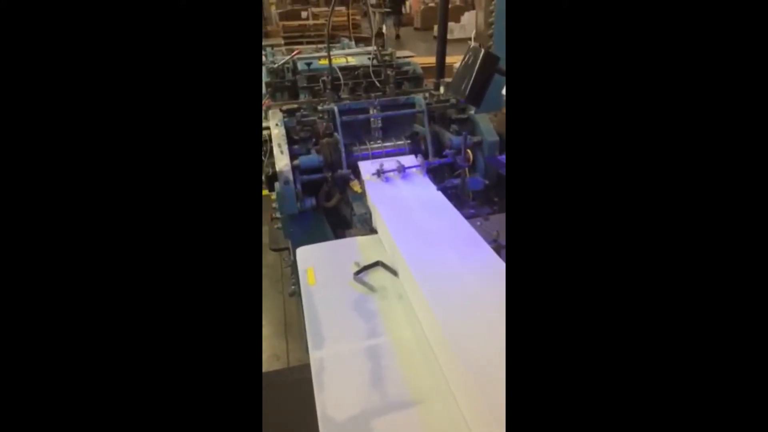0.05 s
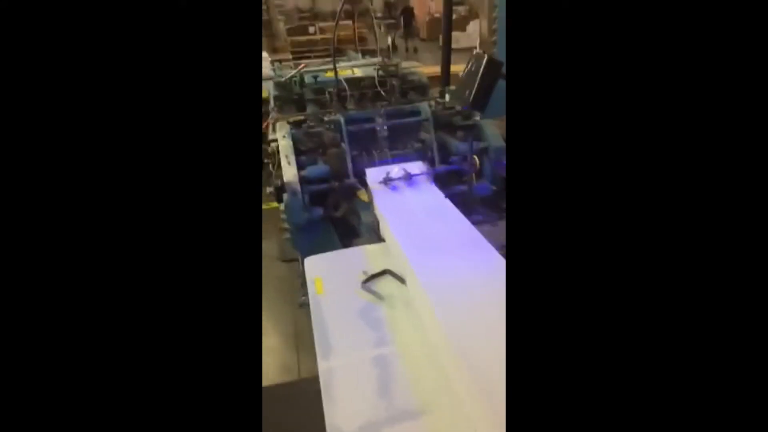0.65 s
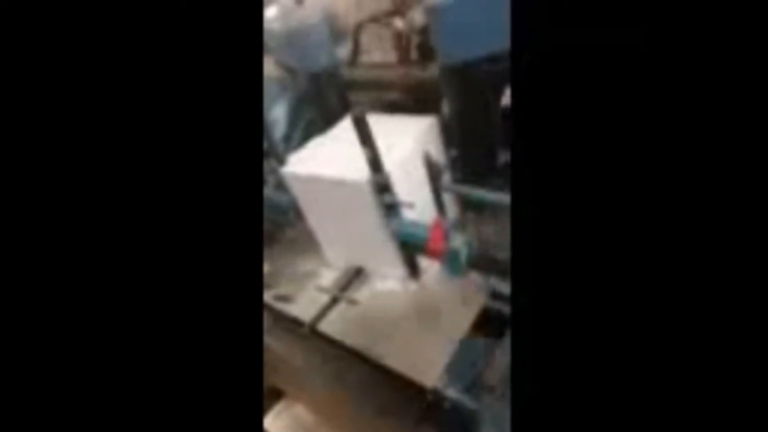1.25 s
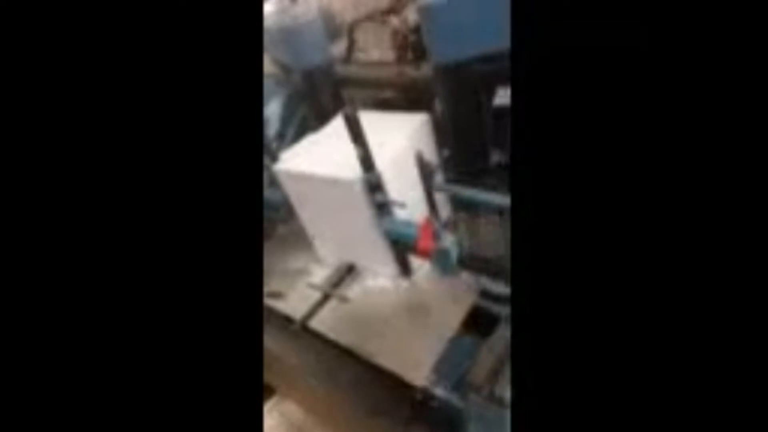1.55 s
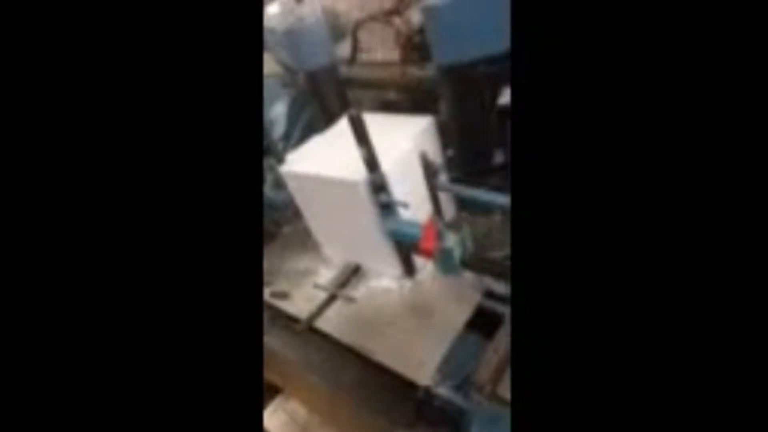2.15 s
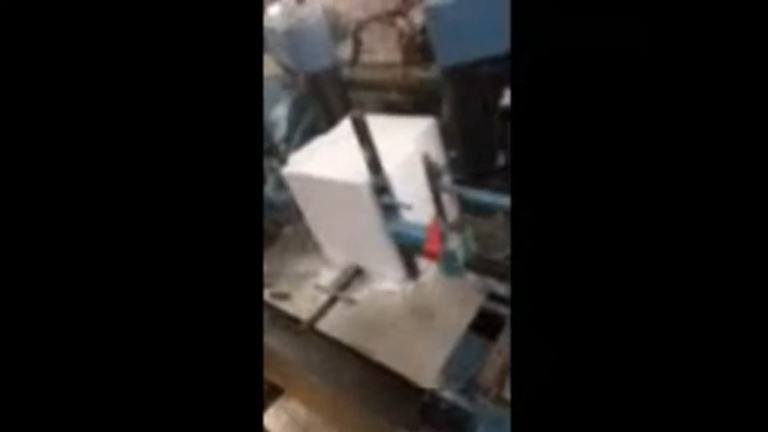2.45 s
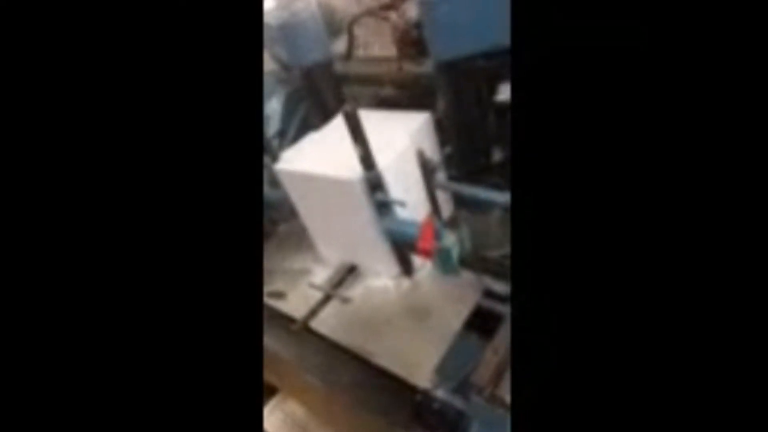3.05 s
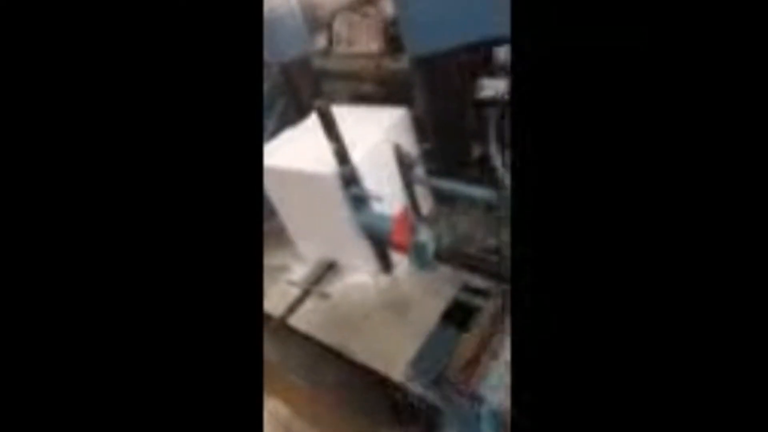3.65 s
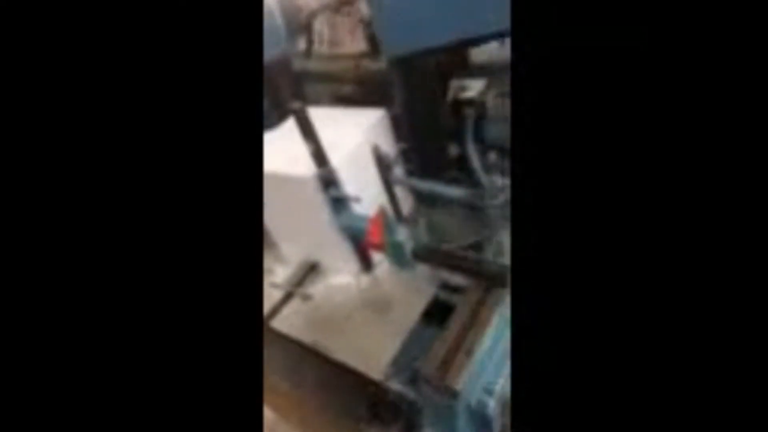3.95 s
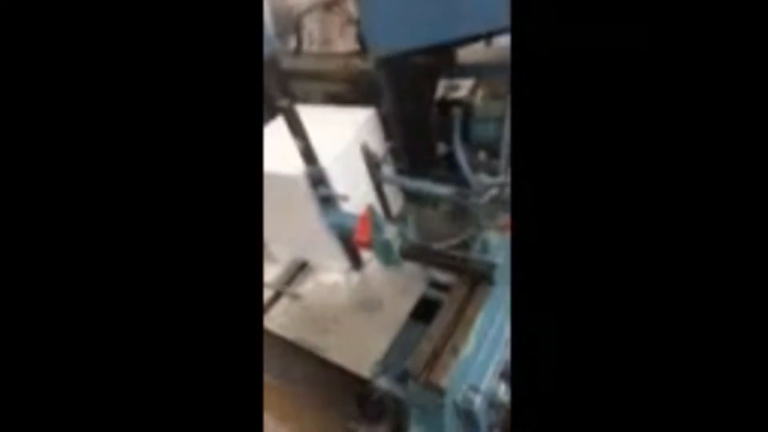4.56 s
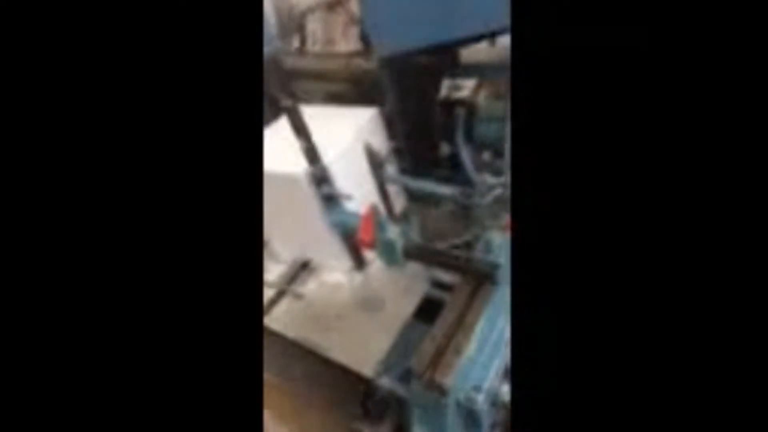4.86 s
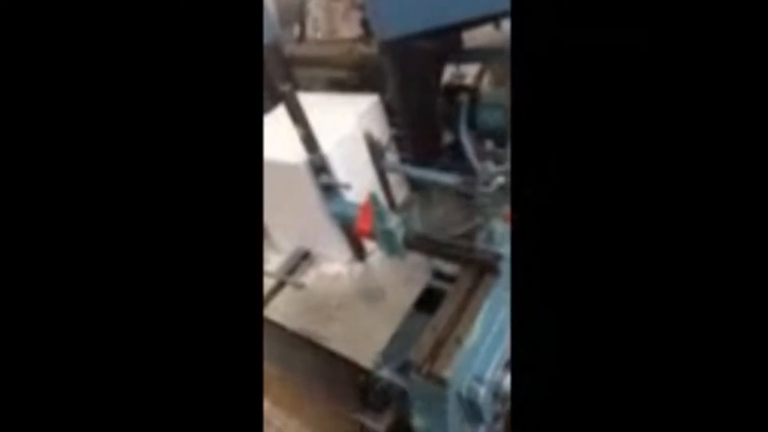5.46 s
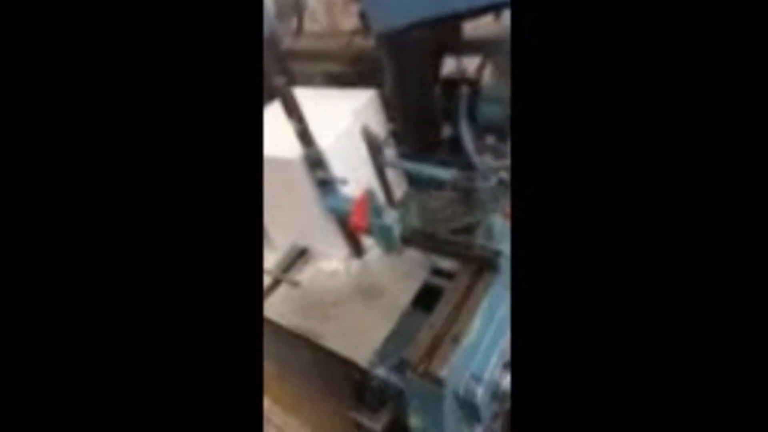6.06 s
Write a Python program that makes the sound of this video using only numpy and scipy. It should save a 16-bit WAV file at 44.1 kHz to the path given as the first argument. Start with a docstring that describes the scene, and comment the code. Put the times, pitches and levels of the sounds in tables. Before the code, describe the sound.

A paper converting machine runs close by in a factory hall, clacking evenly about seven times a second. At first it is heard at the paper feed: bright, ringing metal impacts, dull knocks from cams and levers, and hissing swishes of paper over a deep rumble and gear hum, with two quick snaps of paper pulling taut in the first 0.3 seconds. At about 0.9 seconds everything cuts to silence. At 1.2 seconds the machine returns at the stacker, at the same pace but muffled, with little treble or deep bass. A heavy, throbbing stroke leads each sharp clack, with busy knocks and paper friction between. A loose part thumps at roughly 2.2, 3, 3.8, 4.7 and 4.9 seconds. From about 4.5 seconds a faint, fluttering rubbing whine rises, strongest near 5.8 seconds, while the clacking continues to the end.

```python
"""A paper converting machine cycles about seven times a second in a factory hall.
In each cycle a metal impact rebounds and excites ringing modes, cams and levers give dull, damped
knocks, and sliding paper makes friction noise, all over drive rumble and gear hum. It is heard first
at the web feed, where the web snaps taut, then, after a silent gap, at the stacker through a narrow
band: there a heavy stroke leads each clack, a loose part thumps and a rubbing whine comes up late."""
import sys
import numpy as np
from scipy import signal
from scipy.io import wavfile
from scipy.ndimage import uniform_filter1d

SR = 44100
rng = np.random.default_rng(int(sys.argv[2]) if len(sys.argv) > 2 else 0)


def generate_wav(signal):
    """Clip the signal to [-1, 1] and save it as 16-bit WAV at the path in sys.argv[1]."""
    frames = np.transpose(np.atleast_2d(signal))
    scaled = np.clip(frames, -1, 1) * 32767
    pcm = np.round(scaled).astype(np.int16)
    wavfile.write(sys.argv[1], SR, pcm)


N = 278271
TIME = np.arange(N) / SR
CYCLE_S = .138706
FEED_START_S, STACKER_START_S = .019, 1.2732  # first clack at each place
GAP_START_S, GAP_END_S = .8555, 1.2335


def amp(db):
    """Amplitude ratio of a level in decibels."""
    return 10 ** (np.asarray(db) / 20)


def unit_rms(x):
    """Normalisation to rms 1."""
    return x / np.sqrt(np.mean(x ** 2) + 1e-20)


def chance(size=None):
    """Uniform scatter between -1 and 1."""
    return rng.uniform(-1, 1, size)


def drift(rate_hz):
    """Random modulation of rms 1: straight lines between rate_hz random values a second."""
    knots = np.arange(0, N / SR + 1, 1 / rate_hz)
    return unit_rms(np.interp(TIME, knots, rng.uniform(-1.034, 1, 8192)[:len(knots)]))


def add(mix, s, sound):
    """Superposition: a sound joins the mix at time s; what falls outside is dropped."""
    start = round(s * SR)
    sound = sound[max(-start, 0):]
    part = mix[max(start, 0):][:len(sound)]
    part += sound[:len(part)]


def cycle_times(first_s):
    """Periodicity: the times at which one phase of the machine cycle recurs."""
    return np.arange(first_s, N / SR, CYCLE_S)


def blow_levels(times, vary_db, accents):
    """Force scatter: random levels in dB, except that each accent sets the blow nearest to it."""
    db = np.asarray(vary_db) * chance(size=(len(times), len(vary_db)))
    for s, *accent_db in accents:
        db[np.argmin(abs(times - s))] = accent_db
    return db


def patchy_noise(spectrum, patchy_db):
    """Spectral shaping of white noise; short patches of time and frequency swell and fade in it."""
    hz, _, bins = signal.stft(rng.standard_normal(N), SR, nperseg=2048)
    points_hz, db = np.transpose(spectrum)
    gain = amp(np.interp(np.log(hz + 1), np.log(points_hz), db))
    steady = signal.istft(bins * gain[:, None], SR)[1][:N] * np.sqrt(SR / 2)
    bins = signal.stft(steady, nperseg=512, noverlap=384)[2]
    patches = uniform_filter1d(rng.standard_normal(bins.shape), size=3, axis=0)
    patches = unit_rms(uniform_filter1d(patches, size=6, axis=1))
    return signal.istft(bins * amp(patchy_db * np.clip(patches, -2, 2)), nperseg=512, noverlap=384)[1][:N]


def hum(tones, waver_db, wobble_rad):
    """Rotating gears and motors radiate tones, modulated in level and phase as the load wavers."""
    out = np.zeros(N)
    for hz, db in tones:
        envelope = np.sqrt(2) * amp(db + waver_db * drift(12))
        out += envelope * np.sin(2 * np.pi * hz * TIME + wobble_rad * drift(8))
    return out


def ring(hz, t60, t):
    """Free vibration of a damped mode, falling 60 dB in t60 seconds."""
    return np.sin(2 * np.pi * hz * t) * amp(-60 * t / t60)


def tick(hz=2200, decay_s=0.00023):
    """First contact is brief, so its spectrum is wide: a dry noise burst of peak 1."""
    t = np.arange(SR // 200) / SR
    pulse = rng.standard_normal(len(t)) * np.exp(-t / decay_s)
    burst = signal.lfilter(*signal.butter(1, [hz / 2, hz * 2], "band", fs=SR), pulse)
    return burst / abs(burst).max()


def clacks(first_s, accents, modes, crack_db, body_db, tick_db, vary_db, bounce_db, bounce_vary_db,
           bounce_s, chatter, chatter_s, detune, spread_s=0.00052):
    """Impact excitation: once a cycle metal strikes, rebounds twice and chatters on the same modes."""
    out, t = np.zeros(N), np.arange(SR // 12) / SR
    attack = round(.015 * SR)
    hz, db, t60 = np.transpose(modes)[:, :, None]
    is_body = hz[:, 0] < 1600
    times = cycle_times(first_s)
    for s, (crack, body) in zip(times, blow_levels(times, [vary_db, vary_db], accents)):
        force = chatter * rng.standard_normal(len(t)) * np.exp(-t / chatter_s)
        force[0] += 1
        gaps_s = bounce_s * np.array([1, .85]) * (1 + 0.12 * chance(size=2))
        rebounds = amp(bounce_db + bounce_vary_db * chance()) * np.array([1, .6])
        force[(np.cumsum(gaps_s) * SR).astype(int)] += rebounds
        # the contact point shifts, scattering each mode's level, pitch and onset
        strength, pitch, path = chance(size=(3, len(modes), 1))
        since_onset = np.maximum(t - spread_s * abs(path), 0)
        rings = amp(db + 2 * strength) * ring(hz * (1 + detune * pitch), t60, since_onset)
        # each blow divides differently between the heavy body and the light edge, which cracks
        for group, level_db in ((is_body, body + body_db), (~is_body, crack + crack_db)):
            response = signal.fftconvolve(force, rings[group].sum(0))[:len(t)]
            attack_rms = np.sqrt(np.mean(response[:attack] ** 2))
            add(out, s, amp(level_db) * response / attack_rms)
        add(out, s, amp(tick_db + crack) * tick())
    return out


def knock(hz, t60, rise_s=0.00089):
    """Cushioned impact: one mode builds up softly and radiates little below its own frequency."""
    t = np.arange(SR // 10) / SR
    vibration = ring(hz, t60, t) * (1 - np.exp(-t / rise_s))
    return signal.lfilter(*signal.butter(1, hz / 4, "high", fs=SR), vibration)


def levers(first_s, knocks, vary_db, loose_s):
    """Periodic impacts: cams and levers knock in every cycle, with scatter in force, time and pitch."""
    out = np.zeros(N)
    for start in cycle_times(first_s - CYCLE_S):
        scatter = rng.uniform(-1.11, 1, (len(knocks), 3))
        for (delay, hz, db, t60), (force, play, pitch) in zip(knocks, scatter):
            blow = amp(db + vary_db * force) * knock(hz * (1 + .05 * pitch), t60)
            add(out, start + delay + loose_s * play, blow)
    return out


def paper(first_s, spectrum, swishes, grain_db, vary_db, patchy_db):
    """Sliding friction: paper tugged in every cycle gives noise swishes whose powers add."""
    power = 0
    for delay, db, rise_s, fade_db_per_s in swishes:
        since = (TIME - first_s - delay) % CYCLE_S
        fade = amp(-fade_db_per_s * since)
        rise = np.exp((since - CYCLE_S) / rise_s)
        power += (amp(db) * np.maximum(fade, rise)) ** 2
    friction = patchy_noise(spectrum, patchy_db)
    rustle = amp(grain_db * drift(600) + vary_db * drift(14))
    return friction * np.sqrt(power) * rustle


def web_snaps(low_hz, decay_s):
    """Sudden tension: the web is jerked taut and radiates a short, bright hiss."""
    # snaps of the web: (time [s], level [dB])
    snaps = [(0.126, -18), (.2655, -15.5)]
    out, t = np.zeros(N), np.arange(SR // 20) / SR
    for s, db in snaps:
        hiss = signal.lfilter(*signal.butter(2, low_hz, "high", fs=SR), rng.standard_normal(len(t)))
        add(out, s, amp(db) * hiss * np.exp(-t / decay_s))
    return out


def hall(direct, wet_db, t60):
    """Reverberation: dense, weak reflections from the frame and the hall follow the direct sound."""
    t = np.arange(SR // 2) / SR
    reflections = rng.standard_normal(len(t)) * (rng.random(len(t)) < .05)
    response = reflections * (t > .004) * amp(-60 * t / t60)
    return direct + amp(wet_db) * signal.fftconvolve(direct, response / np.linalg.norm(response))[:N]


def feed():
    """Superposition at the web feed: ringing clacks, knocks, deep rumble, hum and hissing paper."""
    # drive rumble: (frequency [Hz], spectral level [dB])
    rumble_spectrum = [(20, -72.5), (38, -60.5), (56, -53), (80, -47), (180, -48), (280, -52), (450, -54),
                       (700, -57), (1030, -54.5), (1500, -57.5), (3000, -62.5), (8000, -66.5),
                       (16000, -74.5)]
    # gear and motor tones: (frequency [Hz], rms level [dB])
    hum_tones = [(58, -35.5), (194, -35), (345, -29), (721, -38.5), (974, -39.5), (1044, -36.5)]
    # modes of the struck metal: (frequency [Hz], relative level [dB], t60 [s])
    modes = [(760, -6, 0.015), (882, 4, 0.023), (1153, -10, .03), (1300, 15.5, 0.031), (1540, 2, 0.036),
             (1770, -3.5, .02), (1810, 3, 0.021), (2193, 3, 0.012), (2720, -5.5, 0.011),
             (3630, -1.5, 0.012)]
    # clacks that stand out: (time [s], crack gain [dB], body gain [dB])
    accents = [(.435, 1, 3), (.712, -3, .5)]
    # cam and lever knocks: (delay after clack [s], frequency [Hz], level [dB], t60 [s])
    knocks = [(0.022, 194, -20.5, 0.024), (0.046, 191.6, -24.5, 0.094), (.066, 634, -11, 0.011),
              (0.069, 1167, -19.5, 0.043), (0.089, 198, -21, 0.036), (0.096, 341, -23.5, 0.067),
              (.111, 186, -14, 0.032), (.126, 304, -17, 0.015)]
    # paper friction: (frequency [Hz], spectral level [dB])
    paper_spectrum = [(300, -82.5), (1500, -61.5), (3300, -59.5), (7000, -66.5), (16000, -80)]
    # tugs of the paper: (delay after clack [s], gain [dB], rise [s], fade [dB/s])
    swishes = [(.079, -3, 0.0036, 268), (0.107, 1.5, .001, 300.5)]
    hits = clacks(FEED_START_S, accents, modes, crack_db=-17.0, body_db=-19.0, tick_db=-10.5,
                  vary_db=1.9, bounce_db=-7, bounce_vary_db=2.5, bounce_s=0.00225,
                  chatter=0.061, chatter_s=0.012, detune=0.013)
    hits += levers(FEED_START_S, knocks, vary_db=9.0, loose_s=0.00074)
    running = patchy_noise(rumble_spectrum, patchy_db=1.5) * amp(1.1 * drift(120))
    running += hum(hum_tones, waver_db=0.5, wobble_rad=0.21)
    sliding = paper(FEED_START_S, paper_spectrum, swishes, grain_db=2.4, vary_db=-1.8, patchy_db=2.5)
    return hall(hits, wet_db=-16.0, t60=0.23) + running + sliding + web_snaps(low_hz=4000, decay_s=0.0042)


def slack(lag_s):
    """Periodic unloading of the stacker drive: 1 when slack, lag_s after each clack; 0 at full load."""
    return np.cos(np.pi * (TIME - STACKER_START_S - lag_s) / CYCLE_S) ** 6


def drive_rumble(level_db, load_db, lag_s, bass_db, bass_load_db, bass_lag_s, rough_db, bass_hz=130):
    """Load modulation: the stacker's rumble dips as the drive goes slack, its bass a little later."""
    # drive rumble: (frequency [Hz], spectral level [dB])
    spectrum = [(20, -78), (55, -102), (80, -66), (115, -51), (180, -50.5), (260, -53), (500, -54),
                (750, -56.5), (1100, -58), (1600, -62.5), (2200, -70), (3150, -69.5), (3700, -79)]
    rumble = patchy_noise(spectrum, patchy_db=2.5)
    bass = signal.sosfiltfilt(signal.butter(3, bass_hz, fs=SR, output="sos"), rumble)
    body = (rumble - bass) * amp(level_db - load_db * slack(lag_s) + rough_db * drift(200))
    return body + bass * amp(bass_db - bass_load_db * slack(bass_lag_s))


def throbs(level_db, vary_db, rise_s, detune, lead_s=0.02423):
    """Structural resonance: a heavy cushioned stroke rings the stacker's frame before each clack."""
    # modes of the frame: (frequency [Hz], relative level [dB], t60 [s])
    modes = [(189.7, 0, 0.058), (142, -12.5, 0.071)]
    # strokes that stand out: (time [s], gain [dB])
    accents = [(2.082, 4.5), (3.608, 6.5), (5.273, -10), (5.411, 4)]
    out, times = np.zeros(N), cycle_times(STACKER_START_S - lead_s)
    for s, (force_db,) in zip(times, blow_levels(times, [vary_db], accents)):
        for hz, db, t60 in modes:
            add(out, s, amp(level_db + force_db + db) * knock(hz * (1 + detune * chance()), t60, rise_s))
    return out


def thumps(hz, t60):
    """Damped impacts: a loose part thumps between clacks, four times six cycles apart, then once more."""
    # blows of the loose part: (time [s], level [dB])
    blows = [(2.187, -5.5), (3.025, -4.5), (3.848, -9), (4.69, -7.5), (4.918, -8)]
    out = np.zeros(N)
    for s, db in blows:
        add(out, s, amp(db) * knock(hz, t60))
    return out


def whine(flutter_db, jitter_rad):
    """Friction-excited vibration: a rubbing part sings, fluttering quickly in level and phase."""
    # partials of the rubbing part: (frequency [Hz], relative level [dB])
    partials = [(1314.5, 10), (2191, -3), (2466, -12)]
    # swell of the whine: (time [s], level [dB])
    swell = [(0, -56), (4.5, -39), (4.8, -41), (5.0, -34.5), (5.5, -32.5), (5.75, -30.5), (5.9, -34),
             (6.3, -33.5)]
    tone = sum(amp(db) * np.sin(2 * np.pi * hz * TIME + jitter_rad * drift(70)) for hz, db in partials)
    return unit_rms(tone) * amp(np.interp(TIME, *np.transpose(swell)) + flutter_db * drift(60))


def stacker():
    """Superposition at the stacker: sharper clacks, busy levers, a heavy throb and a late whine."""
    # gear and motor tones: (frequency [Hz], rms level [dB])
    hum_tones = [(173, -41), (346, -35.5), (463, -39), (591, -43), (843, -44)]
    # modes of the struck metal: (frequency [Hz], relative level [dB], t60 [s])
    modes = [(890, 4, 0.055), (900, 2.5, 0.054), (1106, 5.5, 0.037), (1220, 5, 0.055), (1340, 4, 0.011),
             (1450, 3.5, 0.025), (1870, -13, 0.0087), (1927, 8, 0.02), (1902, -5, 0.066), (2123, 13, 0.011),
             (2450, -7, 0.018), (3030, -23, .008)]
    # clacks that stand out: (time [s], crack gain [dB], body gain [dB])
    accents = [(2.105, 2.5, -4), (2.244, -7, 4), (2.521, 2.5, -0.5), (3.077, 1.5, 5), (3.631, 1, 5),
               (3.909, -1, 4), (4.048, 1, -16), (4.325, 2, 3.5), (4.741, 1.5, -3), (5.018, -3, 2),
               (5.157, 2.5, -7), (5.573, 1, 2.5)]
    # cam and lever knocks: (delay after clack [s], frequency [Hz], level [dB], t60 [s])
    knocks = [(0.0219, 339, -19, .02), (0.0268, 191, -27.5, 0.017), (0.0353, 311, -18.5, 0.019),
              (.0405, 575, -11.5, 0.02), (0.0461, 333, -11.5, 0.019), (0.0516, 167, -16, 0.026),
              (0.0586, 360, -18.5, 0.013), (0.0804, 243, -11.5, 0.017), (.0875, 367, -10.5, .02),
              (0.1005, 218, -14.5, 0.0084), (0.102, 469, -9, 0.019), (0.1273, 313, -19.5, 0.033)]
    # paper friction: (frequency [Hz], spectral level [dB])
    paper_spectrum = [(300, -64), (900, -67.5), (1800, -61), (2500, -61.5), (3100, -63.5), (3700, -69)]
    # tugs of the paper: (delay after clack [s], gain [dB], rise [s], fade [dB/s])
    swishes = [(0, -1, 0.018, 242), (.087, -2, 0.011, 150), (0.107, -4.5, .008, 200)]
    hits = clacks(STACKER_START_S, accents, modes, crack_db=-18.5, body_db=-22.5, tick_db=-15,
                  vary_db=2.0, bounce_db=-4.5, bounce_vary_db=5.5, bounce_s=.0035,
                  chatter=0.039, chatter_s=0.01, detune=0.014)
    hits += levers(STACKER_START_S, knocks, vary_db=3.5, loose_s=.0003)
    hits += throbs(level_db=-6.5, vary_db=1.5, rise_s=0.0059, detune=0.054) + thumps(hz=326, t60=0.018)
    running = drive_rumble(level_db=-.3, load_db=3, lag_s=0.0018,
                           bass_db=2.0, bass_load_db=3, bass_lag_s=.014, rough_db=1.3)
    running += hum(hum_tones, waver_db=2.5, wobble_rad=0.9) + whine(flutter_db=3.0, jitter_rad=0.46)
    sliding = paper(STACKER_START_S, paper_spectrum, swishes, grain_db=2.1, vary_db=1.65, patchy_db=3.5)
    return hall(hits, wet_db=-14, t60=0.071) + running + sliding


def scene():
    """Gating with short ramps: the feed, a silent gap, then the stacker."""
    feed_gate = uniform_filter1d((TIME < GAP_START_S) * 1., size=128)
    stacker_gate = uniform_filter1d((TIME > GAP_END_S) * 1., size=128)
    return (feed() * feed_gate + stacker() * stacker_gate)[None]


def record(dry, low_cut_hz=66, slow_rate_hz=8000, edge_hz=16000):
    """Clipping and band limiting; the stacker also loses its deep bass and is sampled slowly."""
    clipped = np.clip(dry[0], -.96, .96)
    thin = signal.sosfilt(signal.butter(3, low_cut_hz, "high", fs=SR, output="sos"), clipped)
    anti_alias = signal.firwin(8001, 3900, window=("kaiser", 6), fs=80 * SR)
    slow = signal.resample_poly(thin, slow_rate_hz, SR, window=anti_alias)
    # linear interpolation leaves faint mirror images of the spectrum in the treble
    narrow = np.interp(TIME, np.arange(len(slow)) / slow_rate_hz, slow)
    sound = np.where(TIME < (GAP_START_S + GAP_END_S) / 2, clipped, narrow)
    band_limit = signal.firwin(511, edge_hz, window=("kaiser", 9), fs=SR)
    return signal.oaconvolve(sound, band_limit, "same")[None]


dry = scene()
out = record(dry)
generate_wav(out)
```